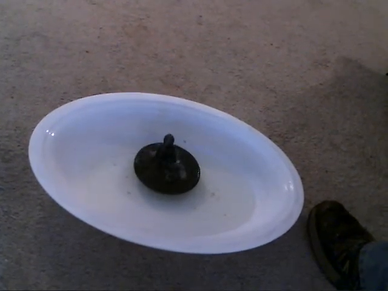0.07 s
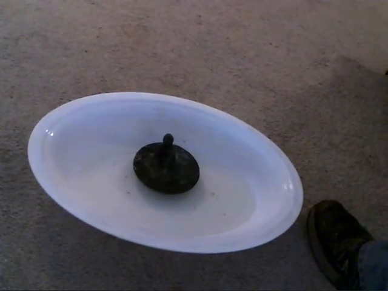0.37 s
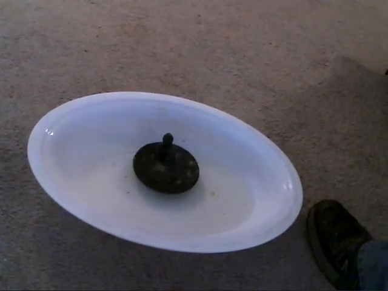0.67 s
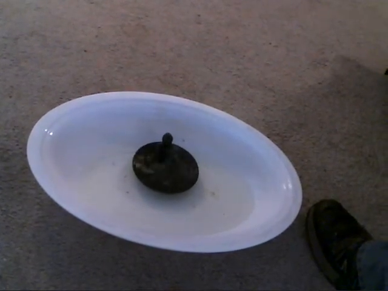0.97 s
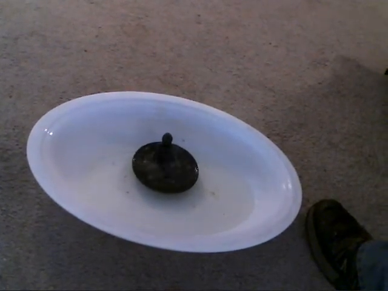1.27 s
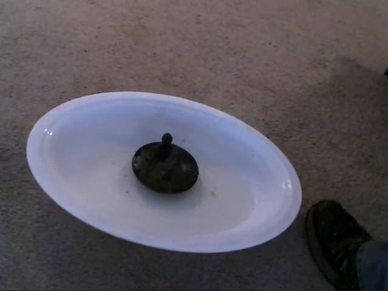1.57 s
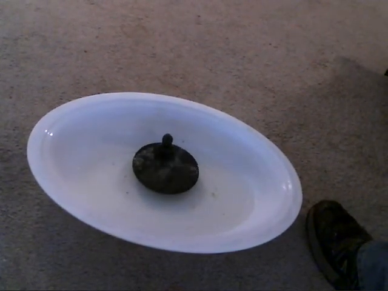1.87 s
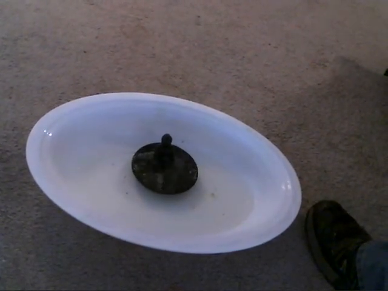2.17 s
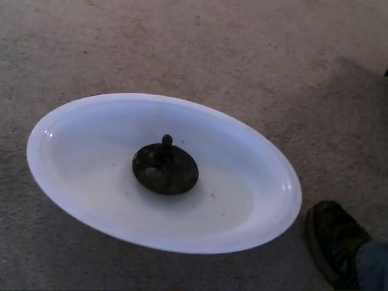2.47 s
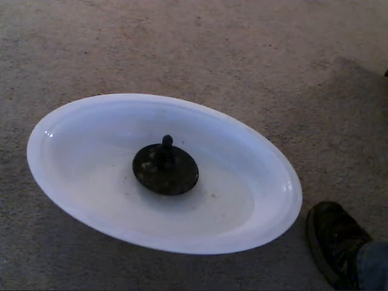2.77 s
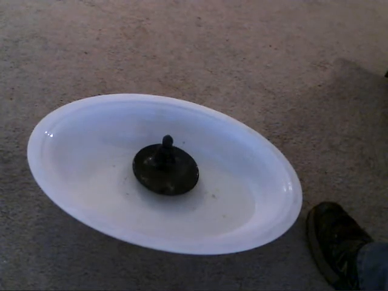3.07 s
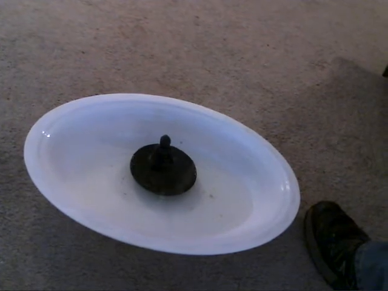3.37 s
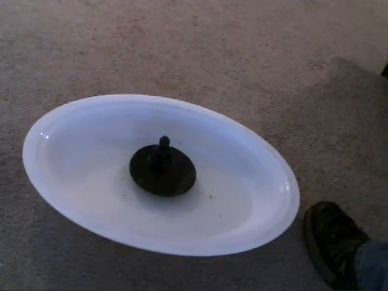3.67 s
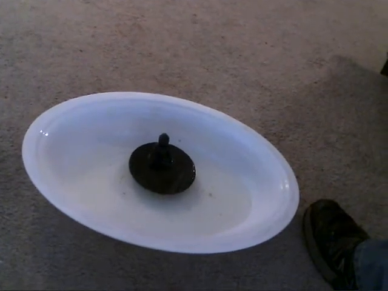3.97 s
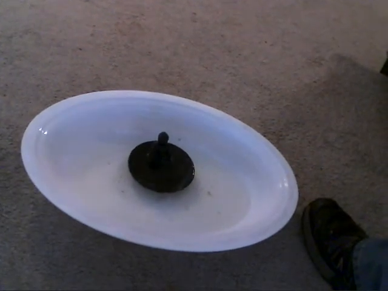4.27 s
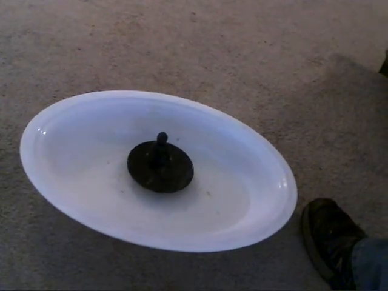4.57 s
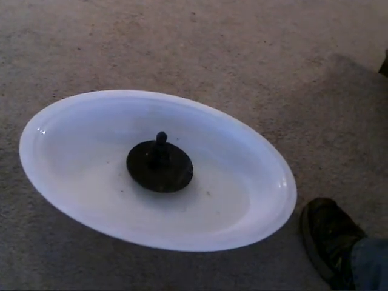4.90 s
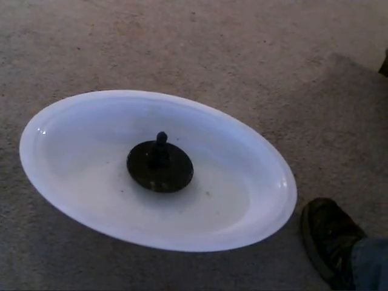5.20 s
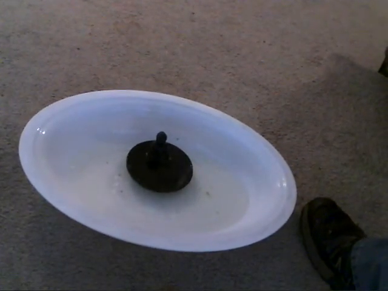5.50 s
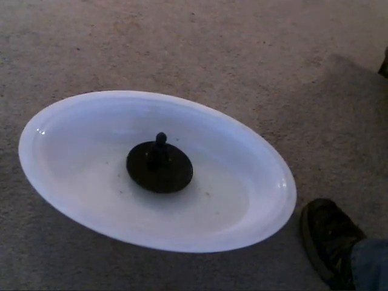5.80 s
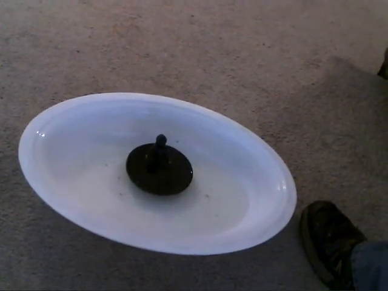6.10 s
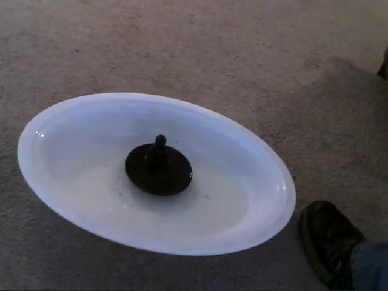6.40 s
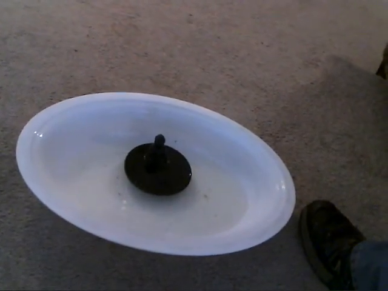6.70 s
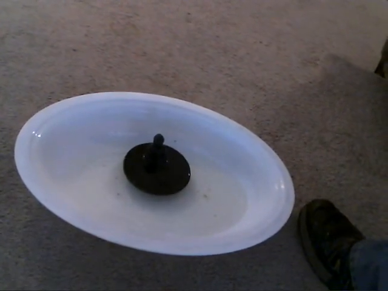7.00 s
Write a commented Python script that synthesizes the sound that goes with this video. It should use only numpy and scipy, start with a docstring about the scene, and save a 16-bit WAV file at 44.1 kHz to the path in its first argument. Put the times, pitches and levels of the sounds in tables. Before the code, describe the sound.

Close by in a small, quiet room, liquid trickles unevenly into a shallow plastic dish on carpet, splashing and popping around a small object. The stream soon thins into quick drips, each a wet smack with a short hollow knock from the plastic. The drips grow sparser and softer, leaving a faint dribble and tiny bubble ticks over a low hush.

```python
"""A stream of liquid splatters over a small knobbed object in a plastic dish on a carpeted floor.
Each impact radiates a brief noise and traps air, which rings as a damped bubble oscillator.
The stream thins into drops that excite the modes of the dish, and ends in a light dribble;
every big drop throws a shower of small ones, and bursting films tick.
The room is small and dry, with a quiet hush, a faint hum and a passing low rumble."""
import sys
import numpy as np
from scipy import signal
from scipy.fft import rfft, irfft
from scipy.io import wavfile
from scipy.ndimage import uniform_filter1d

SR = 44100
rng = np.random.default_rng(int(sys.argv[2]) if len(sys.argv) > 2 else 0)


def inscribe(sig):
    """Save sig as 16-bit PCM at rate SR to the path in sys.argv[1].

    A 1-D sig is mono; a 2-D sig holds one channel per row.
    Samples are clipped to [-1, 1] before scaling.
    """
    pcm = np.round(np.clip(np.atleast_2d(sig).T, -1, 1) * 32767)
    wavfile.write(sys.argv[1], SR, pcm.astype(np.int16))


N = 310905
TIME = np.arange(N) / SR

# Events and envelopes; levels are relative, and each source applies its own gain.
# the loudest bubbles and wet pops: start_s, level_db, pitch_hz, cycles_to_peak
BUBBLES = [(0.0115, -33, 6240, 5), (0.0224, -27.5, 5730, 3.1), (0.0324, -29, 6240, 2.2),
           (0.0616, -24.5, 2980, 2.3), (0.062, -21, 6650, 1.6), (0.112, -37, 765, 4.4),
           (0.1188, -30, 3350, 5.7), (0.2016, -31.5, 2930, 2.6), (0.4313, -31.5, 6340, 2.2),
           (0.456, -45, 2580, 4), (0.4668, -36, 2500, 3.9), (0.4765, -35.5, 2430, 1.9),
           (0.492, -34.5, 2350, 5), (0.5035, -31, 5650, 2.4), (0.5201, -29.5, 2160, 3.1),
           (0.5412, -21, 7350, 2.2), (0.566, -34, 2280, 2.2), (0.575, -36, 3000, 1.2),
           (0.5927, -18.5, 4170, 1.1), (0.5963, -21, 2280, 1.2), (0.6184, -23.5, 2220, 1.9),
           (0.6381, -27, 5050, 3.3), (0.682, -28.5, 5300, 1.6), (0.7, -24, 2560, 0.87),
           (0.7004, -28.5, 3410, 5.5), (0.7353, -25.5, 4360, 3.1), (0.7409, -19.5, 5330, 0.73),
           (0.7712, -29, 4220, 2.2), (0.787, -27, 5560, 2.5), (0.8004, -25, 5430, 2.3),
           (0.812, -32, 5400, 2), (0.827, -36.5, 2430, 2.9), (0.862, -33, 2240, 2.3),
           (0.875, -34, 2430, 2.8), (0.8644, -29.5, 4300, 4), (0.8752, -20.5, 5100, 1.07),
           (0.892, -27.5, 6050, 2.2), (0.9396, -24, 2120, 2.6), (0.962, -26.5, 4000, 2.6),
           (0.973, -32, 2570, 2.2), (1.008, -35, 2560, 2.7), (1.0275, -29, 2340, 2.9),
           (1.0328, -31, 2650, 4), (1.0417, -32, 4200, 4.3), (1.05, -34.5, 1080, 2),
           (1.0531, -17.5, 4500, 0.94), (1.0744, -24, 6640, 3.5), (1.0918, -24.5, 4000, 1.5),
           (1.1078, -36, 4740, 1.2), (1.126, -23, 6160, 2.1), (1.1386, -20, 2000, 0.66),
           (1.154, -27.5, 1900, 1.2), (1.162, -38, 1310, 3.6), (1.1932, -21, 5550, 3.7),
           (1.2094, -36.5, 928, 3.05), (1.2098, -31.5, 2170, 3.9), (1.222, -31.5, 1103, 0.73),
           (1.2547, -31, 2420, 2.5), (1.256, -18, 4070, 1.9), (1.2716, -26, 2280, 1.7),
           (1.298, -27, 2350, 1.2), (1.3266, -29.5, 1900, 2), (1.3716, -31.5, 4600, 2.2),
           (1.3975, -31.5, 2430, 2.9), (1.4078, -31, 2160, 3.8), (1.419, -20.5, 2470, 2.1),
           (1.4303, -24.5, 832, 1.48), (1.438, -50, 1100, 0.74), (1.448, -32, 5340, 20),
           (1.479, -30.5, 2600, 3.1), (1.499, -35, 2380, 4.3), (1.514, -33, 5400, 3.3),
           (1.556, -34.5, 2450, 10), (1.5645, -38, 2370, 2.2), (1.5575, -28, 5760, 2.2),
           (1.5849, -34, 2440, 2.4), (1.5953, -30.5, 2210, 3), (1.5975, -29, 5000, 2.8),
           (1.623, -23.5, 3940, 1.15), (1.6274, -29, 2180, 3.8), (1.645, -24, 2330, 2.9),
           (1.663, -28.5, 2190, 0.74), (1.673, -33, 1805, 2), (1.6982, -31, 2510, 5.5),
           (1.7157, -21.5, 1990, 1.47), (1.729, -42.5, 672, 4.1), (1.733, -33, 2230, 3.6),
           (1.772, -29.5, 2500, 4.7), (1.7744, -26.5, 3570, 3.5), (1.779, -26, 5600, 2.9),
           (1.793, -33.5, 6700, 4.3), (1.804, -32, 1925, 3.9), (1.815, -34, 1750, 2.6),
           (1.83, -37, 2510, 2.7), (1.859, -39.5, 1520, 4.6), (1.873, -37, 5030, 10),
           (1.894, -37.5, 7300, 8.5), (1.846, -34, 2250, 2.5), (1.847, -43.5, 906, 2.3),
           (1.9253, -27, 2420, 4.6), (1.946, -13, 4730, 0.88), (1.959, -24.5, 3300, 3.8),
           (1.9867, -26.5, 1800, 2.3), (2.002, -31, 2440, 4.8), (2.021, -41, 830, 3.5),
           (2.089, -35.5, 2350, 4), (2.106, -36, 2350, 2.2), (2.1197, -8.5, 5150, 1.04),
           (2.12, -37, 2460, 2), (2.1371, -25, 748, 2.13), (2.148, -26.5, 1313, 3.3),
           (2.1579, -14.5, 3730, 2.2), (2.165, -28.5, 1420, 1.8), (2.1756, -32, 4540, 5.9),
           (2.1868, -30, 3420, 6), (2.2004, -21, 5300, 1.9), (2.219, -28, 5340, 1.3),
           (2.223, -27, 5230, 2.3), (2.2245, -39, 3300, 5.7), (2.251, -38.5, 1450, 2.3),
           (2.2662, -35, 755, 3.7), (2.3135, -37.5, 752, 2.6), (2.328, -38.5, 7770, 7.3),
           (2.3558, -40.5, 1520, 1.6), (2.3864, -16.5, 3450, 1.8), (2.405, -31, 2200, 2.5),
           (2.4155, -39, 3840, 5.4), (2.478, -32, 4300, 2.8), (2.5035, -31.5, 4160, 1.56),
           (3.012, -36, 5680, 7.1), (3.1462, -28.5, 3960, 1.8), (3.185, -33, 3700, 1.8),
           (3.42, -32.5, 2670, 3.4), (3.4325, -37.5, 2610, 3.7), (3.803, -37, 3050, 4.7),
           (3.846, -41, 3370, 0.96), (4.032, -43, 3270, 2.9), (3.968, -41, 2650, 3.1),
           (4.1345, -33, 3230, 1.9), (4.3707, -35.5, 5270, 3), (4.4314, -36, 4250, 1.5),
           (4.453, -36, 3040, 3.3), (4.4922, -34.5, 2700, 3.2), (4.5, -32, 3000, 2.5),
           (4.5155, -27, 5070, 2.2), (4.5755, -39, 3000, 4.3), (4.639, -38.5, 3100, 2),
           (4.7476, -16, 4200, 1.64), (4.77, -28, 7950, 0.61), (4.859, -32, 5200, 4.3),
           (4.877, -24, 4800, 1.4), (4.95, -33.5, 3170, 1.4), (5.039, -35, 5200, 5),
           (5.072, -37, 4200, 2.1), (5.0818, -32, 4800, 1.2), (5.125, -37.5, 5530, 5),
           (5.582, -37.5, 5600, 1.9), (5.1339, -32.5, 6000, 3.6), (5.682, -31, 3900, 4.4),
           (5.749, -43, 5650, 2.8), (6.0715, -21, 5900, 1.2), (6.3354, -33, 5960, 0.65),
           (6.4224, -33.5, 6600, 3.5), (6.6296, -37, 5100, 0.67), (6.6817, -28, 2490, 3.7),
           (6.7189, -30, 5370, 2.2)]
# big drops striking the dish: start_s, dish_db, splash_db
DROPS = [(2.36, -42.5, -62), (2.692, -43.5, -46.5), (2.704, -49, -55), (2.738, -42.5, -56),
         (2.764, -40, -49), (2.793, -39, -43.5), (2.804, -40, -75), (2.809, -41, -55), (2.831, -38.5, -43),
         (2.858, -42, -46), (2.894, -34, -45.5), (2.932, -45, -59), (2.943, -38.5, -69), (2.964, -37, -68),
         (2.987, -43.5, -65), (3.007, -48, -48), (3.028, -45, -38), (3.035, -37.5, -40.5),
         (3.061, -44.5, -64), (3.115, -53, -59), (3.127, -44.5, -43), (3.138, -44, -43), (3.145, -41, -32),
         (3.165, -45, -45), (3.192, -61, -52), (3.204, -37.5, -39.5), (3.223, -41, -45),
         (3.236, -44.5, -47), (3.281, -50, -49.5), (3.304, -46, -52), (3.321, -47, -63),
         (3.361, -36, -45.5), (3.383, -34.5, -49), (3.431, -45.5, -65), (3.447, -48, -69),
         (3.464, -40, -47), (3.471, -50, -54), (3.48, -39, -43), (3.491, -42, -56), (3.506, -36.5, -65),
         (3.522, -48, -47), (3.544, -36, -52), (3.559, -46.5, -72), (3.601, -41.5, -57), (3.613, -50, -56),
         (3.687, -43, -44), (3.701, -45, -60), (3.725, -44.5, -45.5), (3.766, -45, -56), (3.776, -36, -37),
         (3.785, -41.5, -37), (3.803, -38, -51), (3.888, -50.5, -46), (3.905, -57, -42), (3.911, -68, -55),
         (3.942, -49.5, -48), (3.967, -59, -38.5), (3.978, -44, -41), (4.028, -64, -42.5),
         (4.047, -42, -61), (4.06, -46, -46), (4.073, -56, -38.5), (4.092, -35, -37.5), (4.114, -50, -40),
         (4.124, -40.5, -44), (4.135, -38, -31), (4.167, -37.5, -35), (4.192, -64, -52),
         (4.206, -41.5, -48), (4.278, -47, -51), (4.289, -42, -41), (4.31, -50, -45), (4.329, -43, -39),
         (4.386, -48.5, -43), (4.452, -31.5, -34.5), (4.492, -49, -51), (4.532, -42, -37),
         (4.545, -48, -41.5), (4.555, -43.5, -43), (4.652, -53, -60), (4.712, -52, -57),
         (4.732, -46.5, -53), (4.748, -49, -33.5), (4.858, -47.5, -44), (4.902, -41.5, -34),
         (4.917, -45.5, -49), (5.006, -37.5, -41), (5.062, -50.5, -44), (5.198, -39, -43.5),
         (5.213, -45.5, -49), (5.23, -44, -77), (5.247, -32.5, -45), (5.33, -53, -57), (5.341, -60, -59),
         (5.373, -69, -45.5), (5.379, -57.5, -46), (5.426, -49.5, -77), (5.505, -49.5, -44.5),
         (5.593, -48, -47), (5.616, -50, -71), (5.634, -42, -60), (5.654, -56, -46), (5.693, -42, -40),
         (5.777, -52, -58), (5.797, -52.5, -71), (5.809, -46, -62), (5.819, -55.5, -64), (5.829, -53, -67),
         (5.932, -54.5, -48), (5.947, -54, -52), (6.02, -55, -75), (6.07, -71, -35.5), (6.168, -80, -51),
         (6.902, -55, -58), (6.957, -52.5, -56)]
# bursting films of liquid: start_s, level_db
FILM_BURSTS = [(0.0627, -38), (0.4147, -35.5), (0.52, -27), (0.801, -35), (1.2205, -33), (1.975, -37),
               (2.3304, -37.5), (2.5977, -37), (2.738, -33), (2.846, -24), (3.0104, -41), (3.1648, -43),
               (3.7245, -33.5), (3.9346, -41), (4.7473, -30), (4.877, -33), (4.9649, -39.5), (5.0113, -42),
               (5.1133, -31.5), (5.4297, -34), (5.6825, -38.5), (5.866, -44.5), (6.0716, -31.5),
               (6.2703, -37), (6.3828, -31), (6.4358, -32), (6.5512, -38)]
# flurries of the finest spray: peak_s, level_db
FLURRIES = [(2.93, -59), (3.29, -56), (3.53, -67), (3.76, -66), (3.83, -68), (4.08, -55), (4.18, -58),
            (4.55, -48), (4.66, -49), (4.79, -54), (4.96, -45.5), (5.08, -68), (5.5, -83), (5.85, -52.5),
            (6.76, -82)]
# soft low bumps: start_s, level_db, pitch_hz
BUMPS = [(0.789, -54, 128), (0.841, -54.5, 187), (0.874, -58.5, 300), (0.901, -66, 136), (1.059, -61, 114),
         (4.459, -52, 199), (4.471, -64, 300), (4.838, -54.5, 190), (6.711, -55, 180)]
# strength of the unbroken stream: time_s, level_db
STREAM_FLOW = [(0, -51.5), (0.1, -60.5), (0.26, -71), (0.381, -71), (0.48, -47), (0.99, -49.5), (1.07, -39),
               (1.3, -52.5), (1.36, -61), (1.41, -45.5), (1.7, -51.5), (2.0, -50.5), (2.06, -55.5),
               (2.191, -52.5), (2.28, -68), (2.62, -83)]
# strength of the broken dribble that follows: time_s, level_db
DRIBBLE_FLOW = [(2.36, -54.5), (2.6, -65), (2.78, -72), (3.09, -86), (3.18, -59), (3.5, -65), (3.66, -61),
                (3.87, -61.5), (4.12, -55.5), (4.25, -71), (4.5, -60), (4.81, -59.5), (5.22, -63.5),
                (5.46, -67), (5.85, -63), (6.6, -64.5), (6.93, -67.5), (7.06, -65)]
# strength of the pool's hollow gurgle: time_s, level_db
GURGLE = [(2.3, -76), (2.4, -56), (2.55, -60), (2.95, -55), (3.25, -57.5), (3.6, -68)]
# normal modes of the wet dish: pitch_hz, level_db, t60_s
DISH_MODES = [(222, -14.5, 0.031), (372, -15, 0.076), (400, -22, 0.042), (606, -7.5, 0.051),
              (671.5, 4.5, 0.041), (765, -15, 0.035), (935, -4, 0.049), (1120, 2, 0.011),
              (1321, -13, 0.069), (1338, 4, 0.017), (1667, -20.5, 0.078), (1794, -18.5, 0.043)]

# Spectral shapes of the sounds named: frequency_hz, density_db
HUSH_SPECTRUM = [(25, -38), (50, -10.5), (80, 4.5), (115, -8), (190, 8.5), (300, 4), (650, -1),
                 (1300, -31.5), (4000, -26), (9000, -22), (16000, -24)]
FROTH_SPECTRUM = [(700, 6), (1300, -3), (1900, -29), (3000, -1.5), (4500, 2.5)]
MIST_SPECTRUM = [(2000, -23), (5000, -73), (7400, 6.5), (8700, -6.5), (9600, 12.5), (10600, 4),
                 (12500, 9.5), (15000, 1.5), (17000, -46)]
SPRAY_SPECTRUM = [(300, -71), (900, -6.5), (1400, -2.5), (2300, 7), (3100, -9), (3800, 3), (5500, 0.5),
                  (7200, -7.5), (8600, -9), (16000, -35)]
SPLASH_SPECTRUM = [(400, -41.5), (1200, 12), (2000, -4.5), (2700, 8), (3400, 2.5), (4300, -18),
                   (5500, -2.5), (7000, -22), (8700, -36), (13000, -52)]
SLAP_SPECTRUM = [(300, -22.5), (800, -37), (1400, 2.5), (2100, 2), (5000, 7.5), (7300, -2.5), (8700, -17),
                 (9600, -5.5), (10600, -18), (16000, -26.5)]
RUMBLE_SPECTRUM = [(20, -24), (50, -24), (90, -11), (140, -16), (400, -62)]
TICK_SPECTRUM = [(1000, -27), (5000, -2.5), (8500, -1), (10000, -2), (12500, 13), (15500, 1)]


def from_db(db):
    """Amplitude grows tenfold per 20 dB."""
    return 10 ** (np.asarray(db) / 20)


def rms_one(x):
    """Normalisation to unit mean power."""
    return x / np.sqrt(np.mean(x ** 2) + 1e-20)


def add(track, start_s, sound):
    """Superposition: a sound adds to the track from start_s on."""
    at = int(np.clip(round(start_s * SR), 0, N - 1))
    track[at:at + len(sound)] += sound[:N - at]


def butterworth(x, order, edge_hz, kind):
    """A causal filter with a maximally flat passband."""
    return signal.sosfilt(signal.butter(order, edge_hz, kind, fs=SR, output="sos"), x + 1e-18)


def coloured(x, spectrum, size=2048):
    """Minimum-phase filtering: a folded cepstrum gives a causal response, scaled to unit energy."""
    hz, db = np.transpose(spectrum)
    bins = np.maximum(np.fft.rfftfreq(size, 1 / SR), 1)
    cepstrum = irfft(np.log(from_db(np.interp(np.log(bins), np.log(hz), db))))
    cepstrum[1:size // 2] *= 2
    cepstrum[size // 2 + 1:] = 0
    response = irfft(np.exp(rfft(cepstrum)))
    return signal.oaconvolve(x, response / np.linalg.norm(response))[:N]


def envelope(rows):
    """A gain interpolated in decibels, inaudible outside its span."""
    time_s, db = np.transpose(rows)
    return from_db(np.interp(TIME, time_s, db, left=-120, right=-120))


def power_sum(*gains):
    """Incoherent sources add in power."""
    return np.sqrt(sum(gain ** 2 for gain in gains))


def shower(events, column, share_db, ceiling_db, lead_s, trail_s, size=11000):
    """Droplet power rises and falls exponentially around each event; returns a gain in time."""
    peak = size // 4
    t = TIME[:size] - TIME[peak]
    shape = np.exp(-2 * np.maximum(-t / lead_s, t / trail_s))
    power = np.zeros(N + size)
    for row in events:
        at = int(np.clip(row[0] * SR, 0, N))
        power[at:at + size] += from_db(min(row[column] + share_db, ceiling_db)) ** 2 * shape
    return np.sqrt(power[peak:peak + N])


def scatter(shapes, spread_db, count):
    """Shot noise: short sounds fall at random moments, many faint and few strong; rms 1."""
    out = np.zeros(N)
    for when, pick, size in rng.random((count, 3)):
        add(out, when * N / SR, from_db(spread_db * size ** 2) * shapes[int(pick * len(shapes))])
    return rms_one(out)


def splat(swell_s, colour_db, size=1024, bands=14):
    """Impact noise: a flattening droplet radiates a randomly coloured burst that peaks at swell_s."""
    hz = np.fft.rfftfreq(size, 1 / SR)
    colour = np.interp(hz, np.geomspace(900, 17000, bands), colour_db * rng.standard_normal(bands))
    noise = irfft(rfft(rng.standard_normal(size)) * from_db(colour))
    age = TIME[:size] / swell_s
    return rms_one(noise) * age * np.exp(1 - age)


def bubble(hz, cycles, rise, wobble=0):
    """Bubble resonance peaks after `cycles` periods and dies; its pitch rises near the surface."""
    age = np.arange(int(6 * cycles / hz * SR) + 2) * hz / (cycles * SR)
    # churned liquid makes the phase wander
    stray = np.interp(age, np.linspace(0, 6, 13), np.cumsum(wobble * np.ones(13)))
    turns = cycles * (age + rise * (age ** 2 / 2 - age)) + stray
    motion = age ** 2 * np.exp(2 - 2 * age) * np.sin(2 * np.pi * turns)
    # only the change of the wall's motion radiates, so little sounds below the pitch
    return np.diff(motion, prepend=0) / (2 * np.sin(np.pi * hz / SR))


def swarm(low_hz, high_hz, cycles, spread_db, count):
    """An incoherent sum of bubbles of random moment, pitch, damping and strength; rms 1."""
    out = np.zeros(N)
    for when, pitch, ring, size in rng.random((count, 4)):
        hz = low_hz * (high_hz / low_hz) ** pitch
        ring_cycles = cycles * 2 ** (2 * ring - 1)
        gain = from_db(spread_db * size ** 2) * hz / np.sqrt(ring_cycles)
        add(out, when * N / SR, gain * bubble(hz, ring_cycles, rise=0.013))
    return rms_one(out)


def dish_ring(swell_s, detune, scatter_db, size=5000):
    """Modal response to one blow; the point of impact and the liquid lying there shift each mode."""
    hz, db, t60_s = np.transpose(DISH_MODES)[:, :, None]
    strength, shift = rng.standard_normal((2, len(DISH_MODES), 1))
    t = TIME[:size]
    phase = 2 * np.pi * (hz * (1 + detune * shift) * t + rng.random(hz.shape))
    # the fourth mode builds up in swell_s, lower ones more slowly
    swell = 1 - np.exp(-(t * hz / (swell_s * hz[3])) ** 2)
    decay = from_db(db + scatter_db * strength - 60 * t / t60_s)
    ring = np.sum(decay * swell * np.sin(phase), axis=0)
    return ring / np.sqrt(uniform_filter1d(2 * ring ** 2, size=200).max())


def background(hush_db=-70.5, hum_db=-78, hum_hz=119.5):
    """Stationary noise and a pure tone: a low hush with a faint hum."""
    hush = from_db(hush_db) * coloured(rng.standard_normal(N), HUSH_SPECTRUM)
    return hush + from_db(hum_db) * np.sin(2 * np.pi * hum_hz * TIME)


def rumble(gain_db=-73, peak_s=1.96, width_s=0.68):
    """Low-frequency noise swells and fades under the pour in a Gaussian envelope."""
    noise = coloured(rng.standard_normal(N), RUMBLE_SPECTRUM)
    return from_db(gain_db) * np.exp(-((TIME - peak_s) / width_s) ** 2) * noise


def room(x, gain_db=-11.5, t60_s=0.18, early_s=0.0084, tail_db=-5, size=14000):
    """Reverberation: dense reflections from dish, floor and near walls, then a short diffuse tail."""
    t = TIME[:size]
    decay = np.exp(-t / early_s) * (t > .003)
    early = rng.standard_normal(size) * decay
    # an even spectrum in the early reflections preserves the colour of the splash
    for _ in range(2):
        flat = irfft(np.exp(1j * np.angle(rfft(early))), size)
        early = flat * decay / np.sqrt(uniform_filter1d(flat ** 2, size=300) + 1e-12)
    tail = rng.standard_normal(size) * from_db(-60 * t / t60_s) * np.clip(t / early_s - .5, 0, 1)
    response = rms_one(early) + from_db(tail_db) * rms_one(tail)
    reflected = signal.oaconvolve(x, response / np.linalg.norm(response))[:N]
    return from_db(gain_db) * butterworth(reflected, 1, 7500, "low")


def bumps(trail_db=-5, trail_s=0.13):
    """Heavily damped low oscillations: dull knocks, each trailed by four weaker ones."""
    out = np.zeros(N)
    for start_s, db, hz in BUMPS:
        add(out, start_s, from_db(db) * bubble(hz, cycles=1.66, rise=0))
        for late, pitch in rng.random((4, 2)):
            knock = bubble(hz * 2 ** (pitch - .5), cycles=0.98, rise=0)
            add(out, start_s + trail_s * late, from_db(db + trail_db) * knock)
    return out


def froth(gain_db=-65.5):
    """Many weak bubble resonances merge into the soft fizz of froth on the puddle."""
    fizz = coloured(swarm(800, 4500, cycles=1.6, spread_db=7, count=2600), FROTH_SPECTRUM)
    strength = np.interp(TIME, [2.6, 2.8, 5.3, 7.05], [0.26, 0.18, 0.0, 0.21])
    return from_db(gain_db) * strength * rms_one(fizz)


def pool(gain_db=-2.5):
    """Large, heavily damped air pockets resonate low and gurgle as the stream slackens."""
    return from_db(gain_db) * envelope(GURGLE) * swarm(340, 510, cycles=1.9, spread_db=13, count=520)


def sloshes(gain_db=-21, swell_s=0.009, below_hz=1600, size=8000):
    """Cavity collapse around each large, low bubble radiates a band of noise about its pitch."""
    out, age = np.zeros(N), TIME[:size] / swell_s
    for start_s, db, hz, _ in BUBBLES:
        if hz < below_hz:
            noise = butterworth(rng.standard_normal(size), 2, [0.73 * hz, 1.26 * hz], "band")
            add(out, start_s, from_db(db + gain_db) * rms_one(noise) * age * np.exp(1 - age))
    return out


def film_ticks(gain_db=-1.5):
    """Film rupture is very brief, so its tick is broadband and bright."""
    out = np.zeros(N)
    for start_s, db in FILM_BURSTS:
        add(out, start_s - .0004, from_db(db + gain_db) * splat(swell_s=0.00041, colour_db=-3))
    return coloured(out, TICK_SPECTRUM)


def crackle(spectrum, swell_s, colour_db, spread_db, count):
    """Filtered shot noise of droplet impacts, some quicker and some slower; rms 1."""
    splats = [splat(swell_s * 2 ** rng.uniform(-.5, .5), colour_db) for _ in range(96)]
    return rms_one(coloured(scatter(splats, spread_db, count), spectrum))


def mist(gain_db=2, fall_db_per_s=8.5):
    """The finest droplets make high shot noise, fed by stream, dribble, flurries and bursting films."""
    strength = power_sum(
        from_db(-5 - fall_db_per_s * TIME) * envelope(STREAM_FLOW),  # the growing puddle cushions it
        from_db(-17) * envelope(DRIBBLE_FLOW),
        shower(FLURRIES, column=1, share_db=-7, ceiling_db=-45, lead_s=0.01, trail_s=0.034),
        shower(FILM_BURSTS, column=1, share_db=-19.5, ceiling_db=-57, lead_s=0.017, trail_s=0.026))
    impacts = crackle(MIST_SPECTRUM, swell_s=0.0005, colour_db=4, spread_db=23, count=1100)
    return from_db(gain_db) * strength * impacts


def spray(impact_db=-10.5, fizz_db=-5.5):
    """Droplets thrown by stream, dribble, pops and drops crackle on impact and entrain tiny bubbles."""
    strength = power_sum(
        envelope(STREAM_FLOW), from_db(-6) * envelope(DRIBBLE_FLOW),
        shower(BUBBLES, column=1, share_db=-29.5, ceiling_db=-29, lead_s=0.00127, trail_s=0.011),
        shower(DROPS, column=2, share_db=-11.5, ceiling_db=-71, lead_s=0.0023, trail_s=0.0066))
    impacts = crackle(SPRAY_SPECTRUM, swell_s=0.00125, colour_db=5, spread_db=16, count=1200)
    fizz = rms_one(coloured(swarm(1800, 7500, cycles=2.6, spread_db=14, count=1200), SPRAY_SPECTRUM))
    return strength * (from_db(impact_db) * impacts + from_db(fizz_db) * fizz)


def patter(gain_db=-1, splash_db=-4, size=2048):
    """Random excitation: small droplets, in the dribble and around big drops, keep the dish ringing."""
    blows = []
    for _ in range(64):
        ring = dish_ring(swell_s=0.0017, detune=0.016, scatter_db=7, size=size)
        wetness = from_db(splash_db) * rng.random()
        splash = coloured(splat(swell_s=0.0011, colour_db=6), SPLASH_SPECTRUM)[:size]
        blows.append(ring + wetness * splash)
    strength = power_sum(
        envelope(DRIBBLE_FLOW),
        shower(DROPS, column=1, share_db=-8, ceiling_db=-46.5, lead_s=0.015, trail_s=0.0093))
    return from_db(gain_db) * strength * scatter(blows, spread_db=10, count=1000)


def drops(splash_db=-2, smack_db=-8, smack_growth=0.17, bubble_db=-4, bubble_hz=3000):
    """Impulsive excitation: each big drop rings the dish, splashes, smacks and traps a bubble."""
    drum, splash, smack, bubbles = np.zeros((4, N))
    for start_s, blow_db, wet_db in DROPS:
        ring = dish_ring(swell_s=0.0019, detune=0.021, scatter_db=2.5)
        add(drum, start_s - .001, from_db(blow_db) * ring)
        add(splash, start_s, from_db(wet_db + splash_db) * splat(swell_s=0.0013, colour_db=5))
        smack_gain = from_db(wet_db + smack_db + smack_growth * (wet_db + 40))  # wetter is brighter
        add(smack, start_s, smack_gain * splat(swell_s=0.0009, colour_db=5))
        late, pitch = rng.random(2)
        tone = bubble(bubble_hz * 2 ** (.8 * (pitch - .5)), cycles=2.6, rise=0.02)
        add(bubbles, start_s + .008 * late, from_db(min(wet_db, -41) + bubble_db - 6 * late) * tone)
    return drum + coloured(splash, SPLASH_SPECTRUM) + coloured(smack, SLAP_SPECTRUM) + bubbles


def churn(gain_db=-5.5, ping_db=-1, sink_oct_per_s=0.37, cycles=4, spread_db=11, count=190):
    """Jet breakup: the stream beads into droplets, each entraining a like-sized and a tiny bubble."""
    out = np.zeros(N)
    first_s, span_s = STREAM_FLOW[0][0], STREAM_FLOW[-1][0] - STREAM_FLOW[0][0]
    for k, (when, pitch, ring, size, tiny) in enumerate(rng.random((count, 5))):
        start_s = first_s + (k + when) / count * span_s
        # the bubbles grow, and so sink in pitch, as the puddle deepens
        hz = 1780 * (2740 / 1780) ** pitch * 2 ** (-sink_oct_per_s * (start_s - 1))
        gain = from_db(spread_db * size)
        add(out, start_s, gain * bubble(hz, cycles * 2 ** (ring - .5), rise=0.021))
        ping_hz = 3800 * (7000 / 3800) ** tiny
        add(out, start_s, gain * from_db(ping_db) * bubble(ping_hz, cycles * 2 ** -ring, rise=0.039))
    return from_db(gain_db) * envelope(STREAM_FLOW) * rms_one(out) * np.sqrt(span_s * SR / N)


def pops(rise=0.008, slap_db=-14, follower_db=-16, throw_s=0.017, spread_oct=0.89, climb_oct=0.56):
    """Air entrainment: a slap of liquid traps a ringing bubble, and a fading shower of others follows."""
    tones, slaps = np.zeros((2, N))
    for start_s, db, hz, cycles in BUBBLES:
        size = max(2500 / hz, 1)  # radius varies inversely with pitch
        tone = bubble(hz, cycles, rise * rng.uniform(0, 2.2), wobble=0.074 * rng.standard_normal(13))
        add(tones, start_s, from_db(db) * tone)
        slap_gain = from_db(db + slap_db) / np.sqrt(size * max(cycles, 1))  # hard slap, short ring
        add(slaps, start_s, slap_gain * splat(swell_s=0.001, colour_db=4.5))
        for late, pitch in rng.random((7, 2)):
            # later bubbles are smaller, so their pitch climbs
            follower_hz = hz * 2 ** (spread_oct * (pitch - .5) + climb_oct * late)
            delay_s = throw_s * size ** 0.88 * (late + 0.1022)
            gain = from_db(min(db, -20) + follower_db - 10 * late)
            add(tones, start_s + delay_s, gain * bubble(follower_hz, cycles=2.9, rise=rise))
    return tones + butterworth(coloured(slaps, SLAP_SPECTRUM), 4, 1700, "high")


def scene():
    """Superposition of the direct sound of liquid and dish, its reverberation and the background."""
    spatter = pops() + sloshes() + film_ticks() + spray() + mist() + churn() + froth()
    spatter = butterworth(spatter, 4, 490, "high")  # tiny bubbles and droplets radiate no bass
    direct = spatter + drops() + patter() + pool() + bumps()
    return (direct + background() + room(direct) + rumble())[None]


def record(dry, cutoff_hz=16600):
    """Band limiting: an elliptic low-pass cuts the highest treble steeply."""
    return signal.sosfilt(signal.ellip(10, .2, 80, cutoff_hz, fs=SR, output="sos"), dry)


dry = scene()
out = record(dry)
inscribe(out)
```